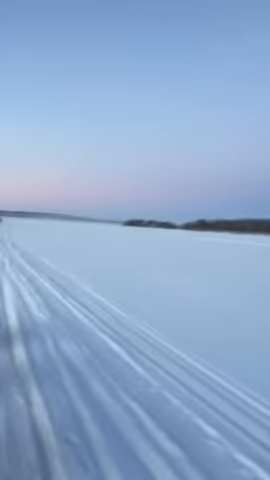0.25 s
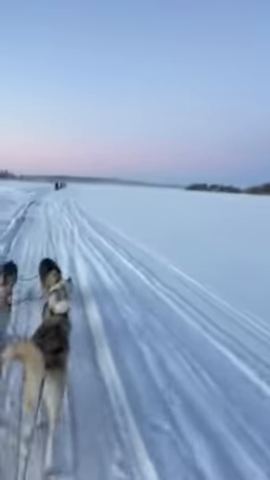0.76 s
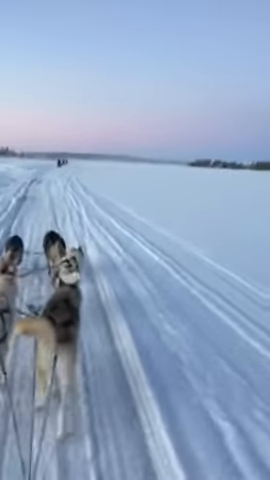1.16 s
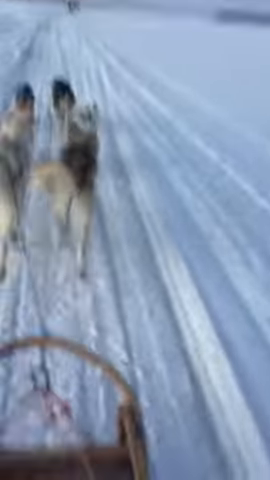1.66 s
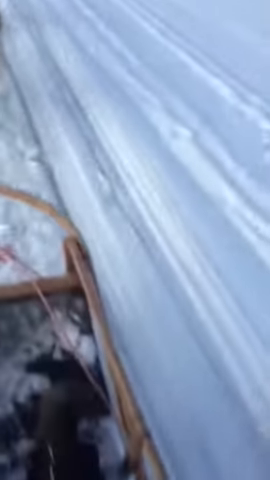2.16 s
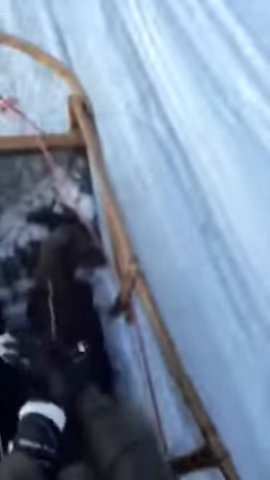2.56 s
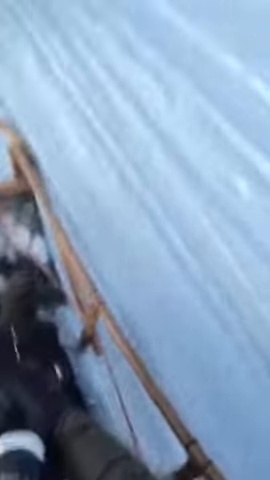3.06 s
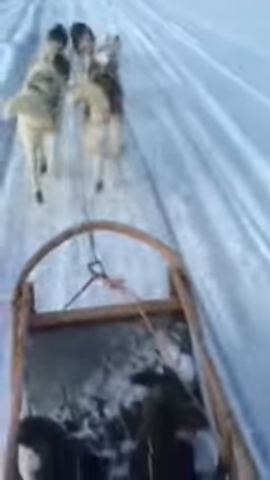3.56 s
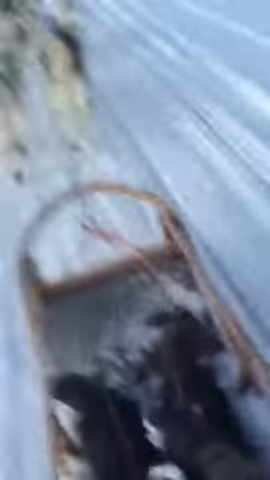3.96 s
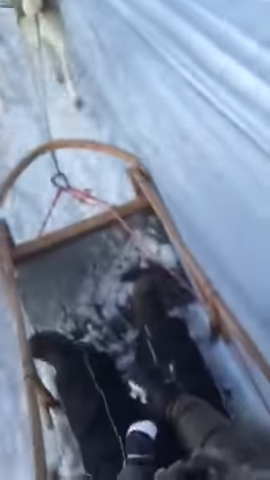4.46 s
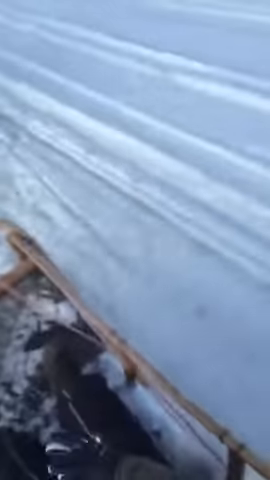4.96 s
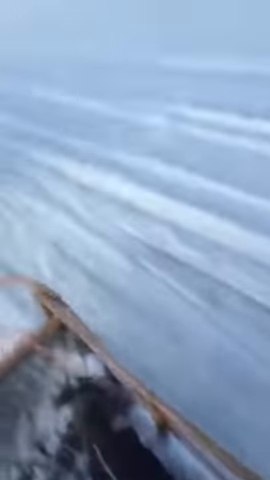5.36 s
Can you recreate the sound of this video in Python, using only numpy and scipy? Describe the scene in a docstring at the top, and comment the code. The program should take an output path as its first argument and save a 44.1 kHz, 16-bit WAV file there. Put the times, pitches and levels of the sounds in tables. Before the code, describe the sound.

A wooden dog sled slides over packed snow, its frame knocking and rumbling while crust crunches and hisses, growing rougher and louder.

```python
"""Sled ride on packed snow

A wooden sled slides over packed snow in open ground, heard dry, with no echo, by a phone the rider holds.
Ridges and hard drifts shake and knock the frame: grains and short blows ring its resonances.
Crust crunches, ticks and snaps, and crystals grind, hiss and spray: filtered grains and bursts of noise.
The headwind buffets the microphone port: low noise with an uneven level.
"""
import sys
import numpy as np
from scipy import signal
from scipy.fft import rfft, irfft, next_fast_len
from scipy.io import wavfile
from scipy.ndimage import uniform_filter1d

SR = 44100
rng = np.random.default_rng(int(sys.argv[2]) if len(sys.argv) > 2 else 0)


def file_out(sig):
    """Save sig as 16-bit WAV at sys.argv[1]."""
    # one column per channel
    cols = np.atleast_2d(sig).T
    # limit, then scale
    lim = np.clip(cols, -1, 1)
    pcm = np.round(lim * 32767).astype(np.int16)
    wavfile.write(sys.argv[1], SR, pcm)


N = 247842

# Table levels are relative: each layer adds its own trim.
# resonances of the wooden frame [f/Hz, width/Hz, level/dB]
FRAME_MODES = [(154.4, 25.3, -5.5), (204.6, 28.1, -1), (260.7, 49.4, -5), (319.7, 29.6, -5.5),
               (425.6, 30, -15.5), (629.4, 59, -18), (140.6, 11.3, -16), (76.5, 45, -35.5)]
# glide between drifts [t/s, shaking level/dB, grind level/dB, hiss level/dB, spray level/dB,
# lean of the shaking toward low modes/(dB per octave)]
GLIDE = [(0.0, -34.5, -41.5, -43.5, -48, 5.5), (0.27, -32.5, -44, -43, -48, -1),
         (0.69, -27, -42.5, -41, -47.5, 2.5), (0.97, -32.5, -42, -42.5, -47.5, 0.5),
         (1.31, -25.5, -43.5, -42, -52, 1), (1.55, -30.5, -42.5, -38, -45, 2),
         (1.9, -27, -38, -37.5, -42, 3), (2.14, -37, -40.5, -37, -41, -0.5),
         (2.34, -30, -43.5, -41, -46, 9), (2.5, -25.5, -37, -37.5, -39, -1),
         (2.7, -23.5, -32.5, -37.5, -59, 1), (3.24, -25, -34.5, -38, -41, 0.5),
         (3.42, -24, -34, -38, -38, 0.5), (3.56, -27.5, -36.5, -38.5, -44.5, 6.5),
         (3.9, -30.5, -40, -35, -42.5, -2.5), (4.12, -21.5, -28.5, -40, -40.5, 1.5),
         (4.5, -25.5, -31.5, -42, -43.5, -0.5), (4.7, -27, -29, -42, -38, 0),
         (4.82, -28, -27.5, -38, -43, -1.5), (4.93, -27, -35, -47, -52, -2),
         (5.05, -22, -27.5, -37, -44, -4), (5.11, -38, -34, -43, -42.5, 1),
         (5.17, -32, -27.5, -37.5, -42.5, -1.5), (5.35, -25, -28.5, -38, -41, -2.5),
         (5.62, -26.5, -28, -38, -40.5, 0)]
# hard drifts the runners plough through [t of the crest/s, length/s, shaking level/dB, grind level/dB,
# hiss level/dB, spray level/dB]
DRIFTS = [(0.022, 0.022, -44, -52, -37.5, -61), (0.46, 0.015, -24, -55, -55, -61),
          (0.624, 0.03, -17, -32, -35.5, -51), (1.062, 0.0092, -26, -49, -50, -58),
          (1.263, 0.025, -25, -38, -34.5, -44), (1.434, 0.02, -14.5, -29.5, -37, -56),
          (1.631, 0.03, -23, -49, -40, -46), (1.734, 0.016, -17.5, -28, -42, -40),
          (1.83, 0.018, -17.5, -24.5, -24.5, -37), (1.994, 0.017, -17, -27, -28.5, -48),
          (2.089, 0.013, -17, -23.5, -48, -53), (2.19, 0.034, -21, -31, -39, -42),
          (2.267, 0.026, -13, -46, -35.5, -54), (2.435, 0.013, -35, -31.5, -35, -54),
          (2.62, 0.063, -30, -45, -31, -44), (2.771, 0.085, -22.5, -26.5, -37, -38),
          (2.811, 0.017, -16, -28, -31, -37), (2.904, 0.034, -19, -26.5, -30.5, -41),
          (3.01, 0.025, -14, -35, -52, -37.5), (3.112, 0.035, -17.5, -24, -36, -37),
          (3.174, 0.012, -35, -43, -33, -50), (3.484, 0.031, -25, -40, -33, -39),
          (3.606, 0.018, -14, -26, -30, -37.5), (3.73, 0.034, -15, -28, -38, -39),
          (4.062, 0.065, -22.5, -30, -42, -39.5), (4.176, 0.023, -19, -22, -32, -48),
          (4.307, 0.03, -17.5, -22, -47, -52), (4.378, 0.031, -13, -20.5, -35, -40),
          (4.434, 0.024, -17, -21.5, -44, -39), (4.644, 0.027, -18, -22, -41, -47),
          (4.713, 0.02, -12, -16, -41, -36.5), (4.796, 0.029, -16, -23.5, -31, -37.5),
          (4.859, 0.033, -21.5, -28, -40, -39.5), (4.968, 0.05, -19, -20.5, -53, -38.5),
          (5.138, 0.072, -20, -29, -41, -51), (5.294, 0.03, -16, -28, -41, -38),
          (5.411, 0.024, -23, -29, -45, -39.5), (5.61, 0.089, -15, -20.5, -29, -38)]
# how each layer swells in a drift [lag/s, rise and fall time constants as shares of the drift length]
SHAKE_SWELL = (0.0073, 0.41, 0.55)
GRIND_SWELL = (0.00077, 0.15, 0.39)
HISS_SWELL = (0.001, 0.25, 0.34)
SPRAY_SWELL = (.001, 0.42, 0.93)
# tone of the crushing crystals, coarse to fine [f/Hz, level/dB]
GRIND_TONE = [(300, 4.5), (500, -2), (1000, 5.5), (1400, 3.5), (1750, -3), (2200, 0), (3500, -3),
              (6000, -72), (12000, -89)]
HISS_TONE = [(800, -17), (2000, -4.5), (4000, -2), (6500, -4.5), (9000, -9), (14000, -31)]
SPRAY_TONE = [(4000, -0.5), (7000, 1), (9500, 0), (12000, -3), (16000, -5)]
# tone of the wind at the port [f/Hz, level/dB]
WIND_TONE = [(18, -36), (35, -12), (55, 3), (80, -4.5), (115, 0.5), (170, -9.5), (400, -10), (800, -28),
             (1500, -56)]
# headwind strength [t/s, level/dB]
GUSTS = [(0.0, -23.5), (0.03, -27), (0.22, -33.5), (0.5, -59), (0.61, -33.5), (1.19, -45), (1.33, -40),
         (1.71, -41), (1.74, -44), (1.97, -37), (2.07, -32), (2.11, -24.5), (2.19, -40), (2.25, -29),
         (2.36, -31), (2.46, -65), (2.82, -35), (2.9, -42), (3.66, -38.5), (3.71, -49), (3.76, -36),
         (3.9, -58), (3.97, -37), (4.12, -47), (4.49, -37), (4.59, -56), (4.66, -38), (5.12, -48),
         (5.23, -35), (5.42, -26), (5.53, -71), (5.62, -32)]
# crust breaking under a runner [t/s, level/dB, centre f/Hz, decay by 60 dB/s]
CRUNCHES = [(0.008, -25.5, 560, 0.24), (0.016, -25.5, 2320, 0.14), (0.135, -28, 625, 0.29),
            (0.396, -23, 970, 0.061), (0.454, -25, 1450, 0.021), (0.6184, -18, 1410, 0.065),
            (1.051, -19, 2580, 0.035), (1.168, -17.5, 2620, 0.037), (1.2475, -17.5, 1110, 0.04),
            (1.38, -16, 1100, 0.031), (1.4232, -26, 1200, 0.029), (1.4443, -15.5, 1470, 0.043),
            (1.62, -19.5, 1070, 0.039), (1.7315, -19.5, 2240, 0.079), (1.748, -18, 2290, 0.054),
            (1.8103, -19, 1390, 0.049), (1.83, -13, 1120, 0.018), (1.908, -21, 3200, 0.048),
            (1.996, -17.5, 2200, 0.055), (2.0664, -17, 2300, 0.043), (2.0855, -11.5, 2150, 0.033),
            (2.19, -20, 2600, 0.041), (2.2103, -16.5, 2540, 0.027), (2.252, -19, 1990, 0.05),
            (2.2636, -7, 1070, 0.049), (2.617, -20, 1680, 0.044), (2.709, -21, 1340, 0.081),
            (2.75, -17, 1330, 0.05), (2.772, -17, 1560, 0.063), (2.8, -19, 1000, 0.089),
            (2.88, -10, 1180, 0.019), (2.8986, -9, 865, 0.038), (3.081, -26, 2470, 0.028),
            (3.097, -11, 1650, 0.084), (3.176, -12, 1420, 0.026), (3.428, -19, 1120, 0.06),
            (3.7202, -21, 2100, 0.082), (3.7326, -16, 920, 0.029), (4.066, -25, 2700, 0.04),
            (4.107, -17, 2200, 0.042), (4.136, -13, 2200, 0.037), (4.146, -12, 1290, 0.066),
            (4.1727, -10, 1300, 0.071), (4.2299, -12, 1150, 0.068), (4.2756, -11.5, 900, 0.051),
            (4.3064, -20, 1130, 0.042), (4.339, -18.5, 1260, 0.15), (4.3777, -18, 1270, 0.027),
            (4.39, -11, 1130, 0.049), (4.432, -15.5, 1330, 0.074), (4.445, -24, 1200, 0.05),
            (4.459, -22, 2800, 0.04), (4.638, -23, 1410, 0.058), (4.683, -21, 1500, 0.04),
            (4.7148, -22, 1460, 0.048), (4.731, -11, 1670, 0.035), (4.788, -21, 1170, 0.055),
            (4.803, -20, 1310, 0.033), (4.831, -10.5, 1170, 0.036), (4.8766, -18, 1090, 0.28),
            (4.9469, -17.5, 947, 0.2), (4.9685, -15, 1460, 0.083), (4.9737, -13, 1240, 0.16),
            (5.124, -15.5, 1180, 0.13), (5.218, -23, 1160, 0.057), (5.2678, -12, 2110, 0.056),
            (5.2953, -14, 1260, 0.029), (5.3667, -19.5, 2880, 0.066), (5.379, -10.5, 990, 0.051),
            (5.3993, -23, 1010, 0.061), (5.523, -14, 2050, 0.072), (5.5501, -11.5, 945, 0.082)]
# bright ticks of ice [t/s, level/dB, centre f/Hz]
TICKS = [(0.027, -30, 2780), (0.174, -27, 2200), (0.195, -29, 2700), (0.456, -27.5, 3000),
         (0.613, -28, 6930), (0.739, -27, 2960), (1.055, -30, 5000), (1.1568, -31, 6520),
         (1.169, -27.5, 5930), (1.198, -36, 2900), (1.249, -33, 2500), (1.379, -25.5, 6440),
         (1.423, -38, 2800), (1.539, -23.5, 2900), (1.7325, -34, 5850), (1.8297, -28, 5530),
         (1.994, -28, 6400), (2.0854, -24, 6890), (2.264, -26, 6100), (2.5505, -27, 9690),
         (2.6165, -31, 5900), (2.631, -29, 11000), (2.742, -25, 5780), (2.7506, -27, 9430),
         (2.897, -19.5, 9180), (3.012, -27, 5500), (3.085, -34, 6000), (3.093, -19, 5650),
         (3.1197, -21.5, 8260), (3.261, -31, 6900), (3.486, -30, 5560), (3.5972, -31, 6220),
         (4.1719, -30, 6370), (4.232, -22, 6200), (4.276, -23, 3800), (4.3375, -30, 6280),
         (4.3475, -29, 5590), (4.359, -24, 9880), (4.4214, -26, 6740), (4.6344, -23, 12730),
         (4.707, -32, 2500), (4.7925, -33, 5690), (4.829, -25, 6700), (5.123, -41, 2500),
         (5.277, -27, 3000), (5.2949, -32, 5750), (5.3652, -26, 5640)]
# knocks of the frame on ridges [t/s, level/dB, f favoured by the place of the blow/Hz]
KNOCKS = [(0.031, -18, 171), (0.135, -15.5, 148), (0.182, -14.5, 228), (0.338, -14.5, 230),
          (0.456, -15.5, 218), (0.558, -14, 142), (0.62, -6.5, 217), (0.738, -17, 207), (1.06, -11.5, 190),
          (1.175, -11, 148), (1.247, -8, 250), (1.386, -12, 157), (1.428, -7, 317), (1.443, -18, 196),
          (1.619, -14, 193), (1.733, -0.5, 180), (1.749, -1.5, 164), (1.827, -5.5, 144), (1.88, -20, 165),
          (1.998, -32, 197), (2.085, -1.5, 316), (2.09, -5.5, 80), (2.106, -11, 186), (2.192, -7, 320),
          (2.21, -4, 145), (2.235, -8.5, 149), (2.258, -3, 80), (2.266, -13, 190), (2.295, -26, 177),
          (2.338, -18, 203), (2.42, -1.5, 180), (2.506, -11.5, 241), (2.618, -8.5, 209), (2.715, -11, 262),
          (2.748, -0.5, 200), (2.799, 0.5, 162), (2.901, -23, 208), (2.926, -1.5, 198), (2.993, -15, 206),
          (3.012, -29, 261), (3.04, -8, 232), (3.101, -4.5, 296), (3.123, -4, 179), (3.18, -8, 203),
          (3.305, -7.5, 160), (3.435, -6.5, 149), (3.466, -8, 148), (3.611, -2.5, 190), (3.731, -3, 245),
          (3.971, -5, 78), (4.01, -16, 243), (4.055, -12, 193), (4.149, 2.5, 200), (4.172, -0.5, 220),
          (4.302, -3.5, 210), (4.387, 9, 199), (4.423, 0.5, 209), (4.561, -9, 178), (4.646, -2.5, 182),
          (4.679, 1.5, 278), (4.72, 3, 196), (4.796, -3.5, 260), (4.872, -2.5, 217), (4.963, -2, 237),
          (5.018, -6, 211), (5.128, 2.5, 212), (5.29, -4, 262), (5.331, -3, 78), (5.4, -22, 185),
          (5.521, -8, 280)]
# hard contacts of a runner on ice [t/s, level/dB, ring f/Hz]
SNAPS = [(0.4572, -19, 1460), (0.6165, -25, 1040), (1.0564, -24, 2550), (1.1708, -23, 2790),
         (1.1982, -26, 1360), (1.2515, -25, 1170), (1.381, -16, 1120), (1.426, -24, 912),
         (1.6216, -21, 1060), (1.7354, -18, 1200), (1.7488, -18, 2140), (1.831, -15, 1080),
         (1.9952, -17, 2800), (2.0002, -17, 1400), (2.0867, -10, 2400), (2.0924, -17, 2190),
         (2.2131, -19, 2560), (2.2653, -5, 1090), (2.6179, -19, 1710), (2.9008, -15, 902),
         (3.0983, -16, 1730), (3.1792, -10, 1380), (3.7333, -17, 953), (4.3066, -18, 1080),
         (4.6413, -21, 1970), (4.7079, -17, 1360), (4.7165, -16, 1530), (4.9679, -14, 1410),
         (4.9776, -12, 1290), (5.1256, -20, 1170), (5.2727, -18, 2130), (5.4007, -18, 1020)]
# dips of the port and its case [f/Hz, width/Hz, level/dB]
PORT_DIPS = [(4920, 480, -4), (7660, 1860, -4), (10400, 530, -6)]


def undb(db):
    """Decibels to gain."""
    return 10 ** (np.asarray(db) / 20)


def unit(x):
    """Scale to rms 1."""
    return x / np.sqrt(np.mean(x ** 2))


def resonate(x, hz, width_hz):
    """Two-pole resonance, gain 1 at the centre."""
    return signal.lfilter(*signal.iirpeak(hz, hz / width_hz, SR), x)


def colour(x, points):
    """Equalise a sound along (f/Hz, level/dB) points joined on a log pitch axis."""
    hz, db = np.transpose(points)
    size = next_fast_len(N)
    bins_hz = np.maximum(np.arange(size // 2 + 1) * SR / size, 1)
    gain = undb(np.interp(np.log(bins_hz), np.log(hz), db))
    return irfft(rfft(x, size) * gain, size)[:N]


def walk(rate):
    """Wandering control of rms 1: random levels held 1 / rate s, then smoothed twice."""
    k = max(int(SR / rate), 1)
    held = np.repeat(rng.standard_normal(N // k + 1), k)[:N]
    return unit(uniform_filter1d(uniform_filter1d(held, k), k))


def curves(table):
    """Columns of a table joined by straight lines in time."""
    s, *columns = np.transpose(table)
    return [np.interp(np.arange(N) / SR, s, column) for column in columns]


def swell(floor_db, crest_db, law):
    """Level in dB: the power of the glide plus a swell that builds up and dies around each drift crest."""
    lag_s, rise, fall = law
    power, t = undb(floor_db) ** 2, np.arange(N) / SR
    for (s, length_s, *_), db in zip(DRIFTS, crest_db):
        near = slice(max(int((s - .3) * SR), 0), int((s + .3) * SR))
        late = (t[near] - s - lag_s) / max(length_s, .004)  # in drift lengths
        power[near] += undb(db) ** 2 * np.exp(np.minimum(late / rise, -late / fall))
    return 10 * np.log10(power)


def grains(rate, spread_db, tail_s, steady):
    """Noise in random grains (rate per second, sudden start, short tail, some larger) over a steady share."""
    sizes = undb(spread_db * np.minimum(rng.exponential(size=N), 3))
    starts = (rng.random(N) < rate / SR) * sizes
    shape = signal.lfilter([1], [1, -np.exp(-1 / (tail_s * SR))], starts)
    return (unit(shape) + steady) * rng.standard_normal(N)


def grit(low_hz, count, rate, spread_db, cycles, steady):
    """Lumps of each size break on their own: narrow bands whose separate grains last some cycles."""
    centres_hz = low_hz * 2 ** (np.arange(count) / 4)
    bands = 0
    for hz in centres_hz:
        band = resonate(grains(rate, spread_db, cycles / hz, steady), hz, hz / 5)
        bands = bands + band / np.sqrt(hz)  # evens out the wider high bands
    return bands


def bursts(table, width, rise_s, gain_db):
    """Each row is a dying burst of noise around its centre; width is a share of the centre."""
    out = np.zeros(N + SR)
    t = np.arange(SR // 4) / SR
    for s, db, hz, t60 in table:
        noise = rng.standard_normal(len(t))
        splinters = noise * np.abs(noise)  # a few large grains among many small
        band = resonate(resonate(splinters, hz, width * hz), hz, 2 * width * hz)
        shape = (1 - np.exp(-t / rise_s)) * np.exp(-np.log(1000) * t / max(t60, .005))
        burst = shape * band
        even = np.sqrt(np.sum(shape ** 2) / np.sum(burst ** 2))  # same energy whatever the draw
        at = int(s * SR)
        out[at:at + len(t)] += burst * even * undb(db + gain_db)
    return out[:N]


def frame_shaking(shake_db, lean_db):
    """Small ridges shake the frame without pause and sound its modes."""
    ridges = grains(110, 2.6, .003, 1.6)
    shaking = 0
    for k, (hz, width_hz, db) in enumerate(FRAME_MODES):
        # the load shifts from slat to slat, so each mode swells on its own
        mode_db = db + 0.83 * walk(6.16) - lean_db * np.log2(hz / FRAME_MODES[1][0])
        shaking = shaking + (-1) ** k * undb(mode_db) * resonate(ridges, hz, width_hz)
    return unit(shaking) * undb(shake_db - 0.5)


def snow(grind_db, hiss_db, spray_db):
    """Crystals crush in dense grains, finer in the treble; rough patches lift all three layers together."""
    patches = walk(45)
    grind = unit(colour(grit(317.5, count=15, rate=50, spread_db=3.0, cycles=10.5, steady=0.88), GRIND_TONE))
    hiss = unit(colour(grit(1180, count=14, rate=54, spread_db=5.5, cycles=18.0, steady=2.0), HISS_TONE))
    spray = unit(colour(grains(960, 1.8, 0.0029, 1.0), SPRAY_TONE))
    return (grind * undb(grind_db - 3.0 + 0.27 * patches + 0.081 * walk(24.2))
            + hiss * undb(hiss_db - 2.37 + 0.18 * patches + .5 * walk(25.4))
            + spray * undb(spray_db + 1.5 + 1.0 * patches + 0.58 * walk(24.6)))


def crackle(grind_db, hiss_db):
    """Single crystals snap: fine, wide clicks that follow the hiss, coarser ones that follow the grinding."""
    fine = resonate(resonate(grains(140, 2.9, 0.0034, 0), 2070, 2200), 2360, 4800)
    coarse = resonate(resonate(grains(220, 2.7, 0.0012, 0), 1140, 1360), 1430, 3000)
    return unit(fine) * undb(hiss_db - 6.0) + unit(coarse) * undb(grind_db - 9.5)


def wind(gust_db):
    """Eddies roll over the port in uneven puffs of low noise."""
    return unit(colour(rng.standard_normal(N), WIND_TONE)) * undb(gust_db + 2.26 * walk(17))


def crunches():
    """Hollow breaks of crust: a dry crack, a broad break and its narrower ring start together."""
    cracks = [(s, db, 3200., .011) for s, db, hz, t60 in CRUNCHES]
    broad = bursts(CRUNCHES, 0.79, 0.0013, -12.5)
    ring = bursts(CRUNCHES, 0.12, 0.0021, -11.5)
    return broad + ring + bursts(cracks, 0.41, .0002, -12.0)


def ice_ticks():
    """Short bright ticks of ice: sharp noise bursts that fall 60 dB in 22 ms."""
    ticks = [(s, db, hz, 0.022) for s, db, hz in TICKS]
    return bursts(ticks, 0.87, .0002, -4.0)


def frame_knocks():
    """Large ridges knock the frame: each blow rings most the modes near its favoured pitch."""
    s, peak_db, favoured_hz = np.transpose(KNOCKS)
    push = np.hanning(int(0.0016 * SR))  # soft contact: the blow lasts milliseconds
    # the phone passes lows a little later than highs: knocks sound 2.4 ms after their table time
    at = np.minimum(((s + 0.0024) * SR).astype(int), N - 1)
    knocks = 0
    for k, (hz, width_hz, db) in enumerate(FRAME_MODES):
        blows = np.zeros(N)
        blows[at] = undb(peak_db + 0.49 * db - 88 * np.log2(hz / favoured_hz) ** 2)
        knocks = knocks + (-1) ** k * resonate(np.convolve(blows, push)[:N], hz, width_hz)
    return undb(13.0) * knocks


def snaps():
    """A runner hits ice: one hard blow gives a wide click and a short ring."""
    out = np.zeros(N + SR)
    blow = signal.unit_impulse(SR // 20)
    click = resonate(resonate(blow, 2600, 5200), 2400, 6000)
    for s, db, hz in SNAPS:
        ring = resonate(blow, hz, 0.18 * hz)
        snap = undb(3) * click + undb(14) * ring
        at = int(s * SR)
        out[at:at + len(blow)] += snap * undb(db)
    return out[:N]


def scene():
    """Mix frame, snow and wind at the phone."""
    *floors_db, lean_db = curves(GLIDE)
    laws = SHAKE_SWELL, GRIND_SWELL, HISS_SWELL, SPRAY_SWELL
    shake_db, grind_db, hiss_db, spray_db = map(swell, floors_db, np.transpose(DRIFTS)[2:], laws)
    # the shaking leans toward the pitch of the nearest knocks
    octaves_below, = curves([(s, np.log2(FRAME_MODES[1][0] / hz)) for s, db, hz in KNOCKS])
    lean_db = lean_db + 0.5 * np.minimum(octaves_below, .5)
    sled = frame_shaking(shake_db, lean_db) + frame_knocks()
    crushing = snow(grind_db, hiss_db, spray_db) + crackle(grind_db, hiss_db)
    breaking = crunches() + ice_ticks() + snaps()
    return (sled + crushing + breaking + wind(*curves(GUSTS)))[None]


def record(dry):
    """The port and its case dip at three pitches; deep bass is cut, loud peaks rounded, the top cut."""
    for hz, width_hz, db in PORT_DIPS:
        dry = dry - (1 - undb(db)) * resonate(dry, hz, width_hz)
    thin = signal.sosfilt(signal.butter(2, 45, "high", fs=SR, output="sos"), dry)
    rounded = 0.92 * thin / (1 + (thin / 0.8) ** 4) ** .25
    top_cut = signal.ellip(12, .2, 80, 15730, fs=SR, output="sos")  # steep, above 15.73 kHz
    return signal.sosfilt(top_cut, rounded)


dry = scene()
out = record(dry)
file_out(out)
```